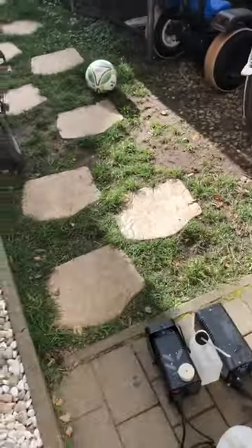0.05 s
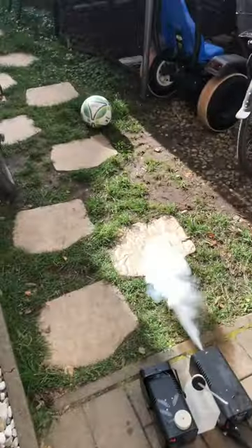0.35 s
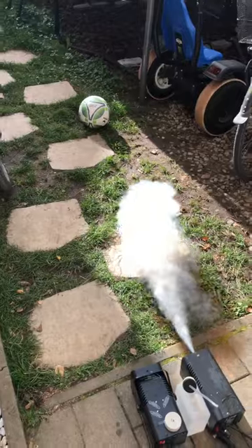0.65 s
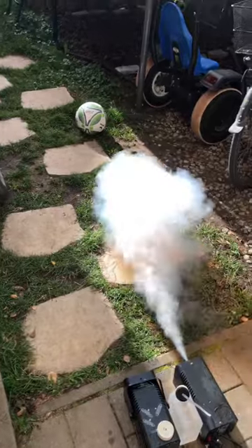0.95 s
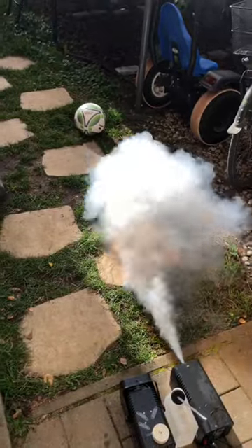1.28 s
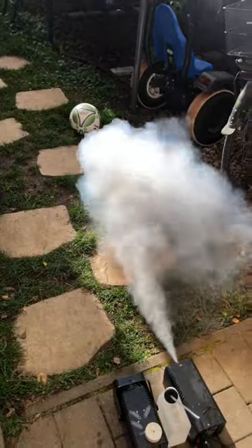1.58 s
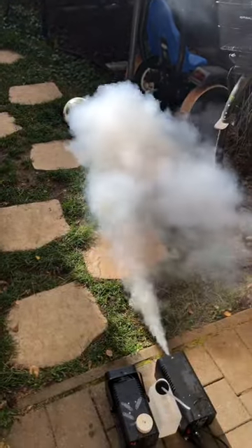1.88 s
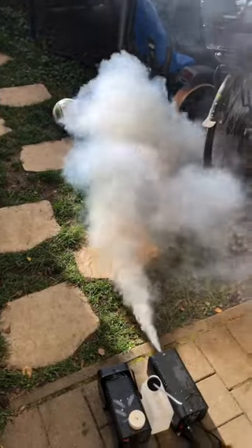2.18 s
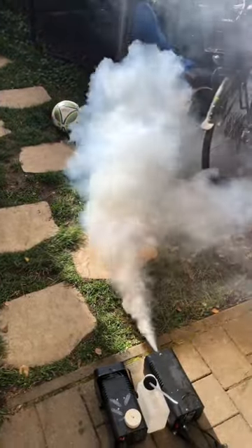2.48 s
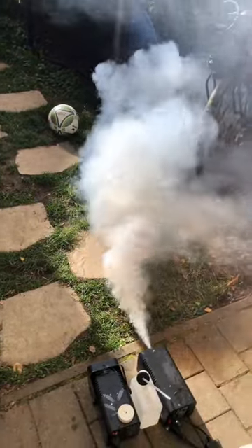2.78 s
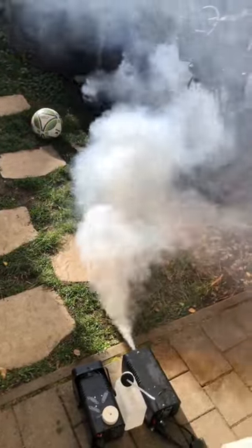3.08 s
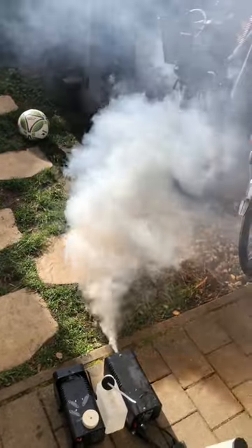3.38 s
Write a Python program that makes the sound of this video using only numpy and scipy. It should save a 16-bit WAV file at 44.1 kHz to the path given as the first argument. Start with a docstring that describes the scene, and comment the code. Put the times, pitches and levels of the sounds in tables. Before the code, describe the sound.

After slight handling noise and a click, a nearby fog machine sprays a bright, continuous hiss of vapour on a garden patio. The hiss builds, then sags and dulls, over a faint outdoor rumble and a few soft bumps.

```python
"""Fog machine on a garden patio

Heard from above at arm's length: after a little handling noise the switch clicks, the pump hums and
a sputtering jet of vapour hisses from the nozzle, bright at full flow and duller as the flow sags.
Paving and garden walls colour the hiss; low outdoor rumble, soft bumps and scuffs lie beneath it."""
import sys
import numpy as np
from scipy import signal
from scipy.fft import rfft, irfft, next_fast_len
from scipy.io import wavfile
from scipy.ndimage import uniform_filter1d, map_coordinates

SR = 44100
rng = np.random.default_rng(int(sys.argv[2]) if len(sys.argv) > 2 else 0)


def file_out(sig):
    """Save sig as 16-bit WAV at sys.argv[1]."""
    # one column per channel
    cols = np.atleast_2d(sig).T
    # limit, then scale
    lim = np.clip(cols, -1, 1)
    pcm = np.round(lim * 32767).astype(np.int16)
    wavfile.write(sys.argv[1], SR, pcm)


N = 160965
TOP_HZ = 15800


def jet(full_flow_db=-33, slack_flow_db=-47, patchy_db=0.54, surge_hz=1170):
    """Vapour hisses from the nozzle: more flow makes it louder and brighter."""
    # hiss level as the flow builds and sags: time_s, level_db
    flow = [(0.25, -42.5), (0.27, -40.5), (0.61, -34), (1.1, -31), (1.52, -31), (1.58, -32.5), (1.64, -31),
            (1.83, -38.5), (1.89, -37.5), (2.16, -40.5), (2.25, -37.5), (2.54, -44.5), (2.79, -44.5),
            (3.01, -42.5), (3.24, -42), (3.5, -47.5), (3.61, -46.5), (3.65, -51.5)]
    # tone of the hiss at full flow: frequency_hz, relative_db
    full_tone = [(150, -18.5), (400, -14), (700, -14), (1000, -13), (1250, -14), (1650, -11.5),
                 (2000, -5.5), (2450, -7.5), (2800, -1), (3400, -3), (4050, -2), (4750, -7.5), (5300, -3),
                 (6300, -2.5), (7100, -4.5), (8200, -3), (8750, -0.6), (9350, 0), (10300, -7),
                 (11600, -3.5), (13200, -3.5), (15500, 0.5)]
    # tone of the hiss at slack flow: frequency_hz, relative_db
    slack_tone = [(150, -12.5), (400, -8), (800, -10.5), (1250, -5.5), (1500, -10.5), (1950, -4),
                  (2400, -2.5), (2850, -1), (3350, 2.1), (3950, 0), (4500, -4), (5400, -7), (5800, -4),
                  (6500, -6.5), (7200, -9.5), (8200, -8.5), (9100, -3.5), (10300, -14), (11600, -9),
                  (13200, -12), (15500, -9.5)]
    # wet surges in the midrange: centre_s, width_s, boost_db
    surges = [(1.51, 0.018, 4.5), (1.64, .014, 2), (3.04, 0.03, 2.5)]
    hz, s, spectrum = signal.stft(turbulence(), SR, nperseg=512)
    flow_db = np.interp(s, *np.transpose(flow))
    fullness = np.clip((flow_db - slack_flow_db) / (full_flow_db - slack_flow_db), -.6, 1.1)
    tone_db = np.outer(along(full_tone, hz), fullness) + np.outer(along(slack_tone, hz), 1 - fullness)
    colour = paving(hz, s) * amp(tone_db)
    colour /= np.sqrt(np.mean(colour ** 2 * (hz < TOP_HZ)[:, None], axis=0))  # tone moves, level holds
    speckle = rng.standard_normal(spectrum.shape)
    patches = unit(uniform_filter1d(uniform_filter1d(speckle, size=6, axis=0), size=16, axis=1))
    midrange = bell(np.log2(hz + 1), np.log2(surge_hz), 1.1)
    surge_db = np.outer(midrange, sum(db * bell(s, at, width) for at, width, db in surges))
    gain = colour * amp(flow_db + patchy_db * patches + surge_db)
    hiss = signal.istft(spectrum * gain, nperseg=512)[1][:N]
    return hiss * nozzle()


def nozzle(leak_start_s=.176, leak_db=-11, open_s=0.195, flutter_db=0.49, flutter_hz=24.75):
    """The jet's envelope: a thin hiss runs ahead, then it opens with a spit and flutters lightly."""
    t = clock()
    opening = np.maximum(ramp(t, open_s, 0.017), amp(leak_db) * (t > leak_start_s))
    spit_db = 4 * bell(t, 0.223, 0.0086)  # the first fluid flashes to vapour
    return opening * amp(spit_db + flutter_db * wobble(flutter_hz))


def turbulence(pops_per_s=260, sputter_db=-14, pop_decay_s=0.00065):
    """White jet noise with tiny bursts of boiling droplets, echoed by the walls."""
    pops = (rng.random(N) < pops_per_s / SR) * rng.exponential(1, N)
    tails = signal.lfilter([1], [1, -np.exp(-1 / (pop_decay_s * SR))], pops)
    sputter = unit(tails * rng.standard_normal(N))
    return unit(walls(rng.standard_normal(N) + amp(sputter_db) * sputter))


def pump(mains_hz=50, start_s=.19, stop_s=1.36, fade_s=.05):
    """The vibrating pump hums on multiples of the mains while the flow builds."""
    # partials of the hum: mains_multiple, rms_db
    partials = [(6, -72), (7, -65.5), (11, -61.5), (12, -68)]
    t, hum = clock(), np.zeros(N)
    for multiple, db in partials:
        peak = np.sqrt(2) * amp(db + wobble(5.9))
        hum += peak * np.sin(2 * np.pi * (multiple * mains_hz * t + rng.random()))
    return hum * ramp(t, start_s, fade_s) * ramp(-t, -stop_s, fade_s)


def switch(crack_t60_s=0.013):
    """Two quick contacts crack and ring the switch housing."""
    # contact strikes: start_s, gain_db
    contacts = [(0.1743, -34), (.1768, -40.5)]
    # ringing modes of the housing: pitch_hz, relative_db, t60_s
    modes = [(1160, -16, 0.019), (2080, -5, .025), (2350, -7, 0.016), (3640, -15, .02), (5570, -11, 0.017),
             (5770, 0, 0.014), (7176, -8, .019), (7620, -1.5, 0.026), (9760, 3, 0.022), (11100, -3, .018)]
    t, out = clock(), np.zeros(N)
    for s, db in contacts:
        ring = sum(amp(level + rng.normal(0, 2)) * decay(s, t60) * np.sin(2 * np.pi * hz * (t - s))
                   for hz, level, t60 in modes)
        crack = decay(s, crack_t60_s) * band(6000, 2.3)
        out += amp(db) * (.6 * ring + .561 * crack)
    return out


def handling(glide_s=0.0071):
    """Ticks, scuffs and soft bumps that fall in pitch, around the machine and the microphone."""
    # small ticks and spits: start_s, level_db, centre_hz, width_octaves, t60_s
    ticks = [(0.028, -48, 2400, 0.94, 0.033), (0.0541, -44, 1900, 0.42, 0.027),
             (.0535, -46.5, 7000, 1.5, 0.012), (0.092, -50, 3400, 0.39, 0.019),
             (0.121, -50, 5970, 0.75, .018), (.199, -45, 3700, .4, 0.027), (1.628, -39, 2000, 0.87, .06)]
    # rustles, puffs and scuffs: centre_s, width_s, level_db, centre_hz, width_octaves
    scuffs = [(0.016, 0.0079, -50.5, 3100, .25), (.02, 0.0091, -59.5, 11000, 0.65),
              (.215, .02, -52.5, 470, 0.64), (1.3, 0.019, -54.5, 540, 0.17), (3.06, .018, -57, 890, 0.18),
              (3.607, 0.021, -50, 950, 0.32), (3.607, 0.021, -51, 4500, 1.2)]
    # soft bumps on the camera: start_s, level_db, first_hz, last_hz, t60_s
    bumps = [(.032, -31, 280, 110, 0.02), (.072, -44, 200, 90, 0.035), (0.216, -39.5, 218, 128, 0.083),
             (2.3458, -34, 362, 147, 0.052)]
    t = clock()
    out = sum(amp(db) * decay(s, t60) * band(hz, octaves) for s, db, hz, octaves, t60 in ticks)
    out += sum(amp(db) * bell(t, s, width) * band(hz, octaves) for s, width, db, hz, octaves in scuffs)
    for s, db, first_hz, last_hz, t60 in bumps:
        age = np.maximum(t - s, 0)
        cycles = last_hz * age + (first_hz - last_hz) * glide_s * (1 - np.exp(-age / glide_s))
        out += amp(db) * decay(s, t60) * ramp(t, s, 0.0022) * np.sin(2 * np.pi * cycles)
    return out


def paving(hz, s):
    """Gain of a slowly gliding comb filter: the hiss bounces between paving and casing."""
    # lag of the bounce as the microphone moves: time_s, lag_ms
    lags = [(.25, 1.47), (.55, 1.412), (.8, 1.395), (1.05, 1.429), (1.3, 1.48), (1.8, 1.514), (2.4, 1.55),
            (2.85, 1.488), (3.25, 1.53), (3.6, 1.64)]
    # strength of the bounce: frequency_hz, share_reflected
    reflection = [(300, 0.15), (2500, 0.27), (3500, .33), (6000, 0.29), (10000, 0.17), (15000, 0.073)]
    lag_s = np.interp(s, *np.transpose(lags)) / 1000
    share = along(reflection, hz)[:, None]
    return np.abs(1 / (1 - share * np.exp(-2j * np.pi * np.outer(hz, lag_s))))


def walls(x, count=80, level_db=-8.5, spread_s=.04, shift_s=0.817):
    """Weak reflections from the garden walls; their pattern shifts as the microphone moves."""
    out, place = x.copy(), clock() / shift_s
    for k in range(int(place[-1]) + 2):
        distance = rng.random(count)
        strength = rng.standard_normal(count) * np.exp(-2 * distance)
        delays = ((.002 + spread_s * distance) * SR).astype(int)
        echoes = np.bincount(delays, strength / np.linalg.norm(strength))
        crossfade = np.sqrt(np.maximum(1 - np.abs(place - k), 0))
        out += amp(level_db) * crossfade * signal.fftconvolve(x, echoes)[:N]
    return out


def outdoors(drone_hz=81.7, drone_db=-59, drone_start_s=2.79):
    """Low rumble of the garden air, joined late by a wavering drone."""
    # tone of the rumble: frequency_hz, relative_db
    rumble_tone = [(20, -40), (35, -24), (52, -2.5), (68, -3), (90, 0.5), (115, -2), (150, -8.5),
                   (250, -13.5), (600, -16.5), (2000, -23), (6000, -32.5), (15000, -45)]
    # swells of the rumble: time_s, level_db
    swells = [(0.0, -55), (0.03, -51.5), (0.12, -55.5), (0.87, -55), (0.9, -50.5), (2.15, -58), (2.37, -51),
              (2.38, -54.5), (3.33, -55), (3.65, -55)]
    t = clock()
    air = unit(filtered(rng.standard_normal(N), lambda hz: amp(along(rumble_tone, hz))))
    drone_peak = np.sqrt(2) * amp(drone_db + 1.9 * wobble(7.57))
    drone = drone_peak * np.sin(2 * np.pi * drone_hz * t + 0.47 * wobble(5.83))
    return air * amp(np.interp(t, *np.transpose(swells))) + drone * ramp(t, drone_start_s, 0.19)


def amp(db):
    """Decibels to gain."""
    return 10 ** (np.asarray(db) / 20)


def unit(x):
    """Scale to rms 1."""
    return x / np.sqrt(np.mean(x ** 2) + 1e-20)


def along(points, hz):
    """Read a curve of (frequency_hz, value) points on a log frequency axis."""
    f, v = np.transpose(points)
    return np.interp(np.log(hz + 1), np.log(f + 1), v)


def clock():
    """Time of each sample in seconds."""
    return np.arange(N) / SR


def bell(x, centre, width):
    """A smooth hump of height 1."""
    return np.exp(-.5 * ((x - centre) / width) ** 2)


def ramp(t, start, length):
    """Rise from 0 to 1."""
    return np.clip((t - start) / length, 0, 1)


def wobble(rate):
    """A smooth random curve, rate knots a second."""
    return map_coordinates(rng.standard_normal(int(N * rate / SR) + 4), [clock() * rate])


def filtered(x, response):
    """Shape x with a gain per frequency."""
    m = next_fast_len(N + SR // 2)
    return irfft(rfft(x, m) * response(np.fft.rfftfreq(m, 1 / SR)), m)[..., :N]


def band(hz, octaves):
    """Noise of rms 1 around a centre frequency."""
    return unit(filtered(rng.standard_normal(N), lambda f: bell(np.log2(f + 1), np.log2(hz), octaves)))


def decay(start_s, t60):
    """A sudden attack that dies away by 60 dB in t60 seconds."""
    age = clock() - start_s
    return (age >= 0) * np.exp(-np.log(1000) * np.abs(age) / t60)


def scene():
    """Everything reaches one microphone, so both channels are alike."""
    mono = jet() + pump() + switch() + handling() + outdoors()
    return np.array([mono, mono])


def record(dry):
    """A hard cut takes off the very top of the treble."""
    return filtered(dry, lambda hz: hz < TOP_HZ)


dry = scene()
out = record(dry)
file_out(out)
```